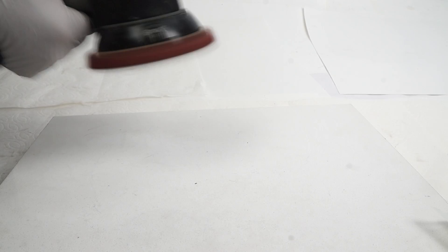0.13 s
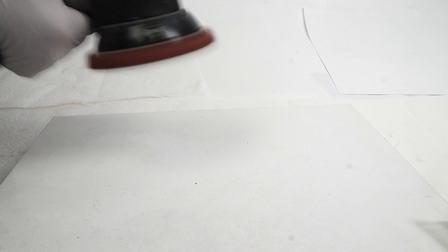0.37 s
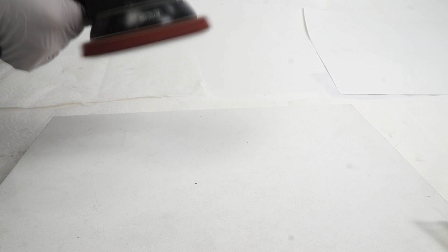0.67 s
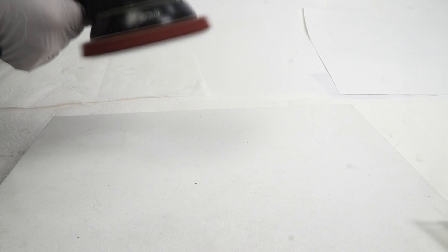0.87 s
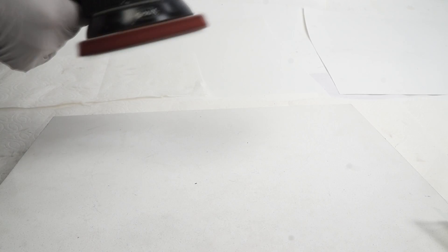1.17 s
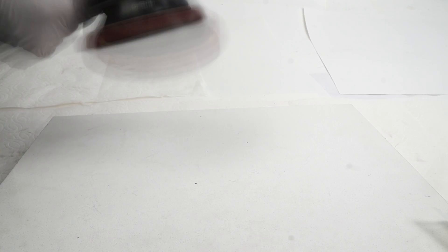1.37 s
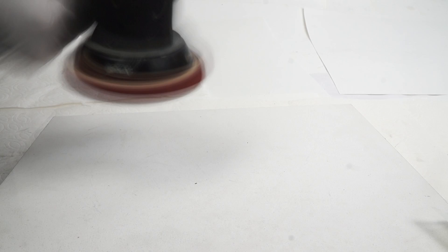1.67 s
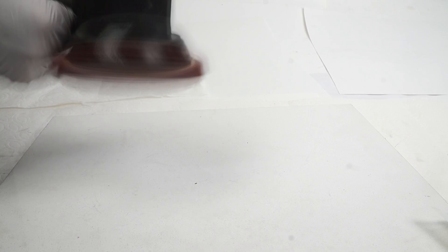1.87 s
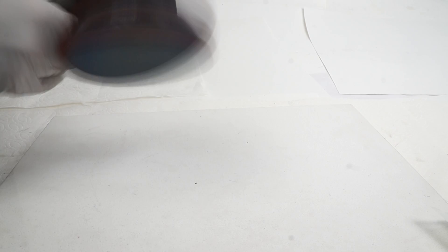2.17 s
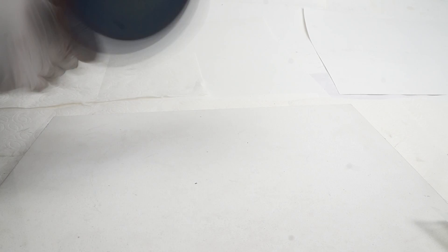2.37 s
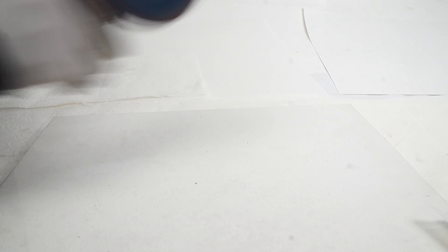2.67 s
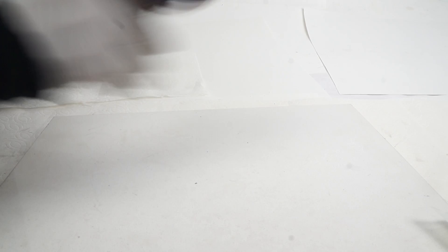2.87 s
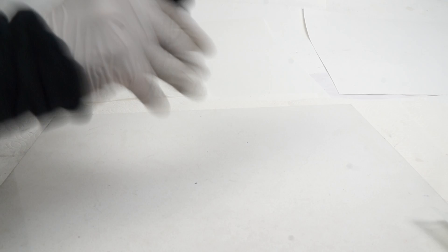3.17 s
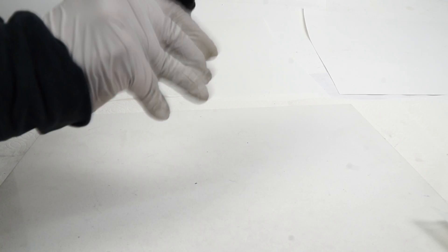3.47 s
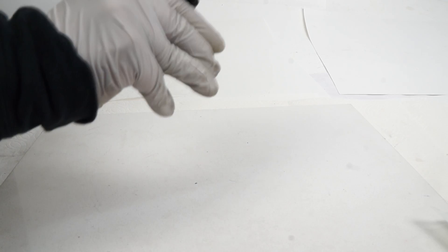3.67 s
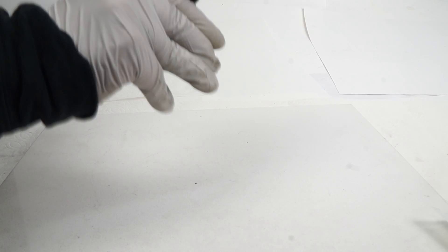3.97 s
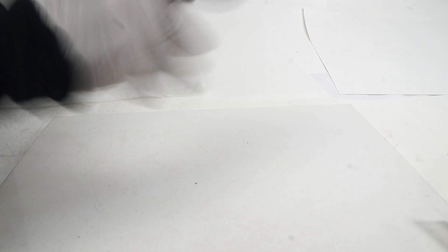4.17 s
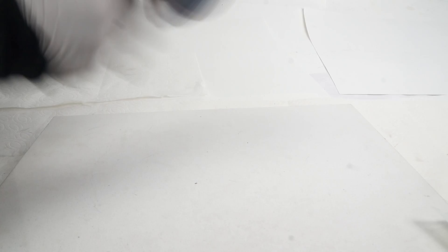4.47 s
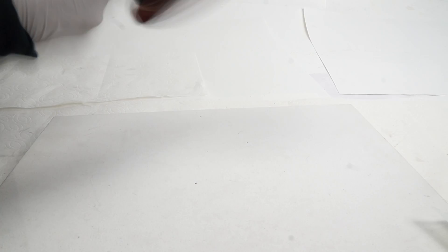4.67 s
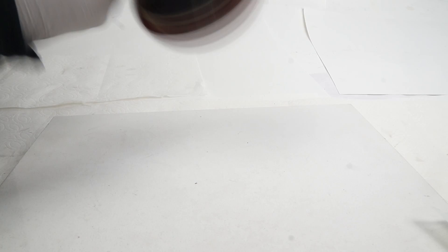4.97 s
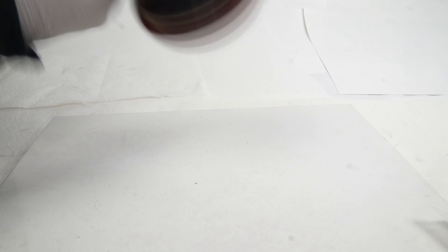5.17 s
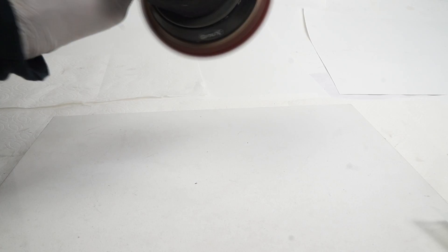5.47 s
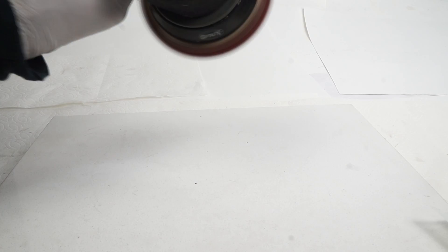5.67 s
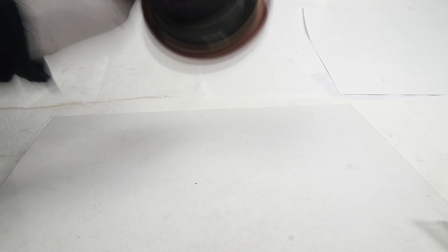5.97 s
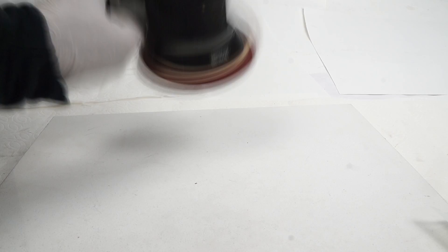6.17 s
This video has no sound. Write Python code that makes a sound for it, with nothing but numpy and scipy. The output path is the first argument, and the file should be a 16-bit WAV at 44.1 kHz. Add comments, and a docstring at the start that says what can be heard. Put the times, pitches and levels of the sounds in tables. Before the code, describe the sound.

Close up in a small workshop with a steady fan drone, an air sander winds down. A low hum, rapid rattle and brief metallic scrapes come first, with a dry hiss. Rapid bearing ticks join in, then a burst of clacks with a thump. The rattle fades into a smooth rolling whirr, until a sharp clack, a faint grumble and more ticks end with a soft bump.

```python
"""A ventilation fan drones in a workshop; close by, an air-powered palm sander coasts down in a gloved hand.
At first its off-centre pad hums (sines) and rattles twice a turn (pulsed noise), with scrapes of metal.
The pad freewheels more slowly than the shaft; its loose bearing soon ticks three times a turn (struck modes).
Clacks and a thump follow as the tool is turned over, then the balls roll on with a smooth whirr.
Late on, the slow pad grumbles in its housing, among more clacks, ticks and a last thump."""
import sys
import numpy as np
from scipy import signal
from scipy.fft import rfft, irfft, next_fast_len
from scipy.io import wavfile
from scipy.ndimage import uniform_filter1d, map_coordinates

SR = 44100
rng = np.random.default_rng(int(sys.argv[2]) if len(sys.argv) > 2 else 0)


def dump(signal):
    """Clip the signal to [-1, 1] and save it as 16-bit WAV at the path in sys.argv[1]."""
    limited = np.clip(np.atleast_2d(signal).T, -1, 1)
    pcm = np.round(limited * 32767).astype(np.int16)
    wavfile.write(sys.argv[1], SR, pcm)


N = 279594

# dry rubbing in the bearing, before each layer's trim: (time [s], level [dB])
DRY_RUB = [(0, -37.5), (.85, -46), (1.3, -47), (2.4, -51), (4, -60), (4.8, -52.5), (5.6, -54), (5.8, -58.5),
           (6.34, -59.5)]
# colour of metal hissing on metal: (frequency [Hz], density [dB per Hz])
HISS_COLOUR = [(2060, -31), (3500, 3), (4290, -1.5), (4750, -2), (6910, 0), (7900, 2), (9810, -11),
               (10800, -9), (11700, -16), (12400, -22), (13600, -12), (16000, -41)]
# resonances of the loose bearing: (frequency [Hz], width [Hz], level [dB])
BEARING_MODES = [(1010, 240, -8), (1630, 136, -3.5), (2210, 77, 1.5), (3210, 340, -4.5), (4660, 190, -1.5),
                 (5350, 480, -6.5), (6990, 420, 3.5), (7580, 245, 6.5), (8320, 780, 4), (9720, 710, -2),
                 (12020, 890, -13), (13500, 130, -8), (14500, 330, -14)]
# dull bumps of the tool's body: (time [s], peak before trim [dB], softness: loss above lowest mode [dB/octave])
BUMPS = [(1.0814, -9, -2.5), (5.3628, -19, 3.5)]


def amp(db):
    """Decibels to gain."""
    return 10 ** (np.asarray(db) / 20)


def unit(x):
    """Scale to rms 1."""
    return x / np.sqrt(np.mean(x ** 2) + 1e-20)


def spread(*shape):
    """Normal chance, clipped to avoid extreme draws."""
    return np.clip(rng.standard_normal(shape or None), -1.5, 1.5)


def along(points, hz):
    """(Hz, value) points read on a log frequency axis."""
    f, v = np.transpose(points)
    return np.interp(np.log(hz + 1), np.log(f + 1), v)


def curve(rows):
    """(s, value) rows as one value per sample."""
    return np.interp(np.arange(N) / SR, *np.transpose(rows))


def level(rows, fade=0.36):
    """Gain of a dB curve that fades away outside its span, with a time constant of fade seconds."""
    t = np.arange(N) / SR
    outside = np.maximum(rows[0][0] - t, 0) + np.maximum(t - rows[-1][0], 0)
    return amp(curve(rows)) * np.exp(-outside / fade)


def wobble(rate):
    """A smooth random curve, rate knots a second."""
    knots = rng.standard_normal(int(N * rate / SR) + 4)
    return map_coordinates(knots, [np.arange(N) * rate / SR])


def wavering(x, depth, rate):
    """x with its pitch straying by the share depth, rate knots a second."""
    position = np.cumsum(1 + depth * wobble(rate))
    return map_coordinates(x, [position], mode="mirror")


def filtered(x, response):
    """x times a response of frequency."""
    size = next_fast_len(N + SR // 2)
    hz = np.fft.rfftfreq(size, 1 / SR)
    return irfft(rfft(x, size) * response(hz), size)[..., :N]


def rush(shape, drive=1):
    """Noise, shaken by drive, through a spectrum; rms 1."""
    noise = drive * rng.standard_normal(N)
    return unit(filtered(noise, lambda hz: amp(along(shape, hz))))


def ringing(modes, f):
    """Response of (Hz, width, dB) resonances, summed with alternating sign."""
    response = 0
    for k, (centre, width, db) in enumerate(modes):
        damping = 1j * f * width
        response = response + (-1) ** k * amp(db) * damping / (centre * centre - f * f + damping)
    return response


def blow(gain, life, size=4096):
    """One short gritty contact through a causal colour, scaled to a peak of about 1."""
    u = np.arange(size) / SR / life
    grit = rng.standard_normal(size) * u * np.exp(-u)
    # folding the cepstrum forward gives the colour minimum phase, so nothing sounds early
    cepstrum = irfft(np.log(np.abs(gain(np.fft.rfftfreq(size, 1 / SR))) + 1e-6))
    colour = np.exp(rfft(2 * cepstrum[:size // 2], size))
    hit = irfft(rfft(grit) * colour)
    return hit / np.linalg.norm(hit) * np.sqrt(life * SR / 2)


def add(track, s, sound):
    """Mix a sound into a track at s seconds."""
    part = track[max(round(s * SR), 0):][:len(sound)]
    part += sound[:len(part)]


def speed():
    """Turns a second of the shaft, coasting down exponentially under drag."""
    start_speed, drag_per_s = 56.4, .164  # turns a second, decay rate
    return start_speed * np.exp(-drag_per_s * np.arange(N) / SR)


def turns():
    """Shaft angle in turns."""
    return np.cumsum(speed()) / SR


def contacts(per_turn, life, scatter_db, jitter):
    """Envelope of contacts tied to the shaft, each with its own strength and slight time shift."""
    at = np.flatnonzero(np.diff(np.floor(per_turn * turns())))
    chance = spread(len(at), 2)
    at = np.clip(at + jitter * SR * chance[:, 0], 0, N - 1).astype(int)
    strikes = np.bincount(at, amp(scatter_db * chance[:, 1]), N)
    u = np.arange(SR // 20) / SR / life
    return unit(signal.fftconvolve(strikes, u * np.exp(-u))[:N])


def fan(fan_db=-49.5, drift=0.58):
    """Ventilation: moving air as a low noise drone, with two tones unsteady in level and phase."""
    # colour of the drone: (frequency [Hz], density [dB per Hz])
    drone_colour = [(20, -11.5), (35, -6.5), (80, -12.5), (140, -7), (195, -11), (232, 4.5), (260, 0),
                    (300, -1), (420, -14.5), (900, -12.5), (1400, -29), (2200, -13.5), (5000, -27.5),
                    (16000, -39)]
    # the tones: (frequency [Hz], mean level [dB])
    fan_tones = [(284, -57.5), (568, -63.5)]
    t = np.arange(N) / SR
    sound = amp(fan_db) * rush(drone_colour)
    for hz, db in fan_tones:
        phase = 2 * np.pi * hz * t + drift * wobble(8.2)
        sound += amp(db + wobble(4.54)) * np.sin(phase)
    return sound


def hum(gain_db=-4, waver_db=1.5):
    """The off-centre pad shakes the tool at the shaft's first orders."""
    # unbalance before trim: (time [s], level [dB])
    unbalance = [(0, -47), (.3, -47.5), (1, -56), (1.9, -54.5), (2.2, -63)]
    # mean strength at 1, 2, 3, .. times the shaft speed: level [dB]
    order_levels = [-1, -5.5, 3, -3.5, -5, -12]
    angle = 2 * np.pi * turns()
    tone = np.zeros(N)
    for order, db in enumerate(order_levels, start=1):
        phase = order * angle + rng.uniform(0, 2 * np.pi)
        tone += amp(db + waver_db * wobble(4.96)) * np.sin(phase)
    return amp(gain_db) * level(unbalance) * tone


def rattle(gain_db=1, even_speed=50, fade_speed=7, far_side=0.93):
    """The pad knocks across its play twice a turn; as it slows, one side knocks harder."""
    # the pad's play before trim: (time [s], level [dB])
    play = [(0, -37), (1.03, -39), (1.15, -47.5), (1.4, -42.5), (1.95, -43.5), (2.1, -50.5), (2.3, -53.5)]
    # colour of the knocking: (frequency [Hz], density [dB per Hz])
    knock_colour = [(88, -32), (150, -9), (189, -6), (289, -11), (350, -4), (386, 0.5), (833, 5),
                    (1090, 2.5), (1200, 3), (1770, 2), (2230, 6), (4120, -12.5), (8410, -10.5),
                    (10600, -22), (15000, -35)]
    rub = .4  # steady rubbing beside the knocks
    lopsided = np.clip((even_speed - speed()) / fade_speed, 0, 1)
    both = contacts(2, life=0.0021, scatter_db=1.5, jitter=0.00046)
    one = contacts(1, life=0.0018, scatter_db=3.5, jitter=0.0011)
    knocks = (1 - lopsided * (1 - far_side)) * both + lopsided * one
    drive = np.hypot(knocks / (1 + far_side * lopsided), rub)
    return amp(gain_db) * level(play) * rush(knock_colour, drive)


def scrape(gain_db=0, rub=1.0, hiss_db=-8, attack=.012, release=0.029):
    """Metal brushes metal, pulsing once a turn; it hisses and rings the steel parts."""
    # spells of scraping, before each trim: (start [s], length [s], level [dB])
    scrape_spells = [(0, .105, -25.5), (.385, .06, -38.5), (0.538, 0.12, -36), (1.456, 0.012, -42.5)]
    # resonances of the steel: (frequency [Hz], width [Hz], level [dB])
    steel_modes = [(4560, 270, -11.5), (5990, 250, 2), (7420, 155, 2.5), (8970, 200, -3),
                   (9620, 300, -11.5), (11800, 890, -14.5), (14500, 250, -14)]
    t = np.arange(N) / SR
    touch = np.zeros(N)
    for start, length, db in scrape_spells:
        rise = np.minimum(t - start, 0) / attack
        fall = np.maximum(t - start - length, 0) / release
        touch += amp(db) * np.exp(rise - fall)
    strokes = np.hypot(contacts(1, life=.002, scatter_db=1.5, jitter=.001), rub)
    ring = unit(filtered(strokes * rng.standard_normal(N), lambda hz: ringing(steel_modes, hz)))
    hiss = rush(HISS_COLOUR, strokes)
    return touch * (amp(gain_db) * ring + amp(hiss_db) * hiss)


def bearing(whirr_db=1, hiss_db=-1, grumble_db=1, grain_db=1.5):
    """A grainy dry hiss, the whirr of freely rolling balls, then the slow pad grumbling in its housing."""
    # free rolling, before trim: (time [s], level [dB])
    whirr_level = [(1.95, -46.5), (2.25, -42.5), (4.15, -44.5), (4.45, -49), (4.65, -56), (6.34, -69)]
    # colour of the whirr: (frequency [Hz], density [dB per Hz])
    whirr_colour = [(400, -16.5), (820, -21), (960, -3.5), (1070, -5), (1190, 2.5), (1320, -3.5),
                    (1500, -7.5), (2300, -12.5), (3200, -17), (4500, -31), (9000, -55)]
    # the grumbling pad, before trim: (time [s], level [dB])
    grumble_level = [(4.7, -78), (4.9, -51), (5.5, -53), (5.8, -57.5), (6.34, -56.5)]
    # colour of the grumble: (frequency [Hz], density [dB per Hz])
    grumble_colour = [(250, 0), (380, 6), (600, 4.5), (780, -4), (950, 8), (1250, -10), (1600, 5.5),
                      (2200, -4.5), (3000, -2), (4000, -24), (4600, -9), (5500, -26), (8000, -35)]
    hiss = rush(HISS_COLOUR, amp(grain_db * wobble(400)))
    rolling = rush(whirr_colour, amp(2.1 * wobble(130)))
    whirr = wavering(rolling, depth=.025, rate=12)
    grumble = rush(grumble_colour, amp(2 * wobble(200)))
    sound = amp(hiss_db) * level(DRY_RUB) * hiss
    sound += amp(whirr_db) * level(whirr_level) * whirr
    return sound + amp(grumble_db) * level(grumble_level) * grumble


def chatter(gain_db=-6):
    """Fainter ticks once a shaft turn ring the bearing, as strong as it is dry."""
    drive = contacts(1, life=.0005, scatter_db=4, jitter=.002) * rng.standard_normal(N)
    ring = unit(filtered(drive, lambda hz: ringing(BEARING_MODES, hz)))
    return amp(gain_db) * level(DRY_RUB) * ring


def catches(scatter_db=1.05):
    """(s, dB) of each catch of the bearing as the freewheeling pad turns."""
    # spells of ticking: (start [s], end [s], first turn [s], each turn longer by [s],
    # stretch of the catches' spacing [ratio], second catch [dB], third catch [dB])
    tick_spells = [ (.164, .66, .0682, .00072, 1.26, 1, -2), (.7295, 1.04, .0741, .00066, 1.2, -14, -4),
                   (1.2413, 2.12, .0743, .0003, .88, -9, -10), (2.1585, 3.05, .0842, .00048, .88, -6, -6),
                   (4.4965, 5.01, .0683, -.0008, 1.05, -8, -7), (5.0185, 5.64, .0695, .00072, 1, -8, -2),
                   (5.675, 5.8, .0825, 0, .95, -5, -14), (5.848, 6.3, .081, 0, .8, -1, -9)]
    # how hard the bearing catches as the tool is tilted, before trim: (time [s], peak [dB])
    catch_force = [(.16, -29), (.58, -13.5), (.75, -21), (1.3, -22), (1.54, -19.5), (2, -22.5), (2.5, -43),
                   (3, -42), (4.5, -30.5), (4.8, -18.5), (5.25, -17.5), (5.65, -19), (5.9, -33.5)]
    # where the bearing catches in each turn, before the stretch: place [share of the turn]
    catch_places = [0, .36, .64]
    for start, end, turn_s, longer_s, stretch, second_db, third_db in tick_spells:
        turn_start = start
        while turn_start < end:
            for share, db in zip(catch_places, [0, second_db, third_db]):
                s = turn_start + stretch * share * turn_s
                if s < end:
                    force_db = np.interp(s, *np.transpose(catch_force))
                    yield s, force_db + db + scatter_db * spread()
            turn_start += turn_s
            turn_s += longer_s


def tick(life, vary_db):
    """One contact rings the bearing's modes at new strengths."""
    modes = [(hz, width, db + vary_db * spread()) for hz, width, db in BEARING_MODES]
    return blow(lambda hz: ringing(modes, hz), life)


def ticks(gain_db=-2, life=0.00074, vary_db=3, bounce_db=-11, bounce_time=.011):
    """At each catch, loose bearing parts drop against each other and bounce once."""
    jolt_s, jolt_db = .015, 2  # a bump sets off at once a catch due this soon, and harder
    track = np.zeros(N)
    for s, db in catches():
        for bump_s, _, _ in BUMPS:
            if 0 < s - bump_s < jolt_s:
                s, db = bump_s, db + jolt_db
        add(track, s, amp(db + gain_db) * tick(life, vary_db))
        bounce_s = s + bounce_time * rng.uniform(0.1, 1)
        add(track, bounce_s, amp(db + gain_db + bounce_db) * tick(life, vary_db))
    return track


def clack(body_db, edge_db, life):
    """One hard contact, with its share of body and of bright edge."""
    # colour of the contact: (frequency [Hz], density [dB per Hz])
    clack_colour = [(300, -10), (1500, -3), (2300, 4), (3000, 6), (4000, 6.5), (4900, -2), (6300, 0.5),
                    (7500, 4), (9500, -1.5), (10600, -3), (12500, -0.5), (14200, -1), (15500, 3)]
    tilt = [(1000, body_db / 2), (3500, body_db), (5800, 0), (9500, 0), (11000, edge_db)]  # (Hz, dB)
    strength = np.sqrt(1 + amp(body_db) ** 2 + amp(edge_db) ** 2)
    return strength * blow(lambda hz: amp(along(clack_colour, hz) + along(tilt, hz)), life)


def steel_ring(t60=0.64, size=SR // 2):
    """Many close steel modes sing on after a blow and blur into a bright hiss."""
    # colour of the afterglow: (frequency [Hz], density [dB per Hz])
    glow_colour = [(2500, -33), (4000, -6), (4700, -13), (5500, -6), (6400, -4), (7500, -4), (8200, -9),
                   (9300, -7), (10500, -22), (13800, -25), (16000, -35)]
    colour = amp(along(glow_colour, np.fft.rfftfreq(size, 1 / SR)))
    glow = unit(irfft(rfft(rng.standard_normal(size)) * colour, size))
    return glow * amp(-60 * np.arange(size) / SR / t60)


def clacks(gain_db=0, life=0.0011):
    """Lever and hose coupling chatter at widening gaps; each contact leaves the steel ringing."""
    # quick runs of contacts: (time [s], contacts [count], first gap [s], first level [dB],
    # change per contact [dB], first body [dB], edge [dB], afterglow against the contact [dB])
    clack_runs = [ (1.0632, 3, .0058, -10, 1, 1.5, -16, -31), (1.0809, 4, .005, -6.5, -1.5, -16, -9.5, -30),
                  (1.592, 2, .004, -16.5, 6, -6, -13, -38), (1.6628, 2, .0056, -21.5, 9, -3.5, -13, -38),
                  (4.6444, 1, 0, -9, 0, -16, 1, -30), (4.654, 4, .0115, -17.5, -1.5, -12.5, -10, -28)]
    gap_growth, body_step_db = 1.1, -5  # each gap over the one before; body change per contact
    track = np.zeros(N)
    for s, count, gap, first_db, step_db, body_db, edge_db, ring_db in clack_runs:
        for k in range(round(count)):
            db = first_db + k * step_db
            contact = clack(body_db + k * body_step_db, edge_db, life)
            add(track, s, amp(db + gain_db) * contact)
            add(track, s, amp(db + ring_db) * steel_ring())
            s += gap * gap_growth ** k
    return track


def thumps(gain_db=-3, attack=0.0014, cut_hz=100):
    """A bump rings the body's damped modes: a quick low push, more hollow when the contact is firm."""
    # modes of the body: (frequency [Hz], level [dB], t60 [s])
    body_modes = [(187, -18, 0.29), (231, -1.5, 0.051), (293, 8, 0.022), (364, -4.5, 0.048),
                  (428, -9.5, 0.073), (651, -13.5, 0.16), (1750, -26, 0.12), (1980, -24, 0.091)]
    track, t = np.zeros(N), np.arange(SR // 3) / SR
    for s, db, softness in BUMPS:
        for hz, mode_db, t60 in body_modes:
            soft_db = softness * np.log2(hz / body_modes[0][0])
            start_db = db + gain_db + mode_db + rng.normal(0, 1) - soft_db
            ring = amp(start_db - 60 * t / t60) * np.sin(2 * np.pi * hz * t)
            add(track, s, ring * (1 - np.exp(-t / attack)))
    # a body this small radiates no deep bass
    return signal.sosfilt(signal.butter(2, cut_hz, "high", fs=SR, output="sos"), track)


def room(x, wet_db):
    """Direct sound in the middle, plus the workshop's decaying noise tail, a little wide."""
    # decay of the workshop: (frequency [Hz], t60 [s])
    room_decay = [(100, 0.21), (500, 0.62), (2000, 0.27), (6500, 0.27), (15000, 0.26)]
    # width of the room's answer: (frequency [Hz], side level [dB])
    room_width = [(30, -5), (125, -17), (500, -5.5), (4000, -9.5), (8000, -16), (13000, -19.5)]
    hz, t, z = signal.stft(rng.standard_normal((2, SR // 2)), SR, nperseg=256)
    decay = amp(-60 * t / along(room_decay, hz)[:, None])
    tail = signal.istft(z * decay, SR, nperseg=256)[1]
    # the tail starts 1/300 s after the direct sound
    tail = np.pad(tail / np.linalg.norm(tail[0]), ((0, 0), (SR // 300, 0)))
    mid, side = amp(wet_db) * signal.fftconvolve(x[None], tail, axes=1)[:, :N]
    side = filtered(side, lambda hz: amp(along(room_width, hz)))
    return x + np.array([mid + side, mid - side])


def gain_control(x, threshold_db=-21, slope=0.5, recovery_db=11, attack=0.017):
    """Loud hits push the gain down; it creeps back by recovery_db a second."""
    t = np.arange(N) / SR
    power = np.abs(uniform_filter1d(x.mean(0) ** 2, size=64))
    loud_db = 10 * np.log10(power + 1e-12)
    cut = slope * np.maximum(loud_db - threshold_db, 0)
    held = np.maximum.accumulate(cut + recovery_db * t) - recovery_db * t
    keep = np.exp(-1 / (attack * SR))
    return x * amp(-signal.lfilter([1 - keep], [1, -keep], held))


def scene():
    """The sander close by and the fan behind it, each layer with its own share of room."""
    mix = room(fan(), wet_db=-6)
    running = hum() + rattle() + scrape() + bearing() + chatter()
    mix += room(running, wet_db=-10.5)
    mix += room(ticks(), wet_db=-14.0)
    mix += room(clacks(), wet_db=-7.0)
    return mix + room(thumps(), wet_db=-16.5)


def record(dry):
    """Two slightly unlike microphone ports, automatic gain and the band limit."""
    # balance of the ports: (frequency [Hz], left over right [dB])
    port_balance = [(100, .1), (500, 0.48), (2500, 0.37), (3400, 0.73), (4200, 1.1), (4800, .1), (8200, .1),
                    (8800, 1.2), (12500, .1)]
    # phase between the ports: (frequency [Hz], left lags by [radians])
    port_lag = [(100, 0), (700, 0), (3200, 0.18), (4400, 0), (7500, 0), (8500, 0.38), (10500, 0.096)]
    top_hz = 15800
    sides = np.array([[.5], [-.5]])  # each port takes half the difference

    def ports(hz):
        """Gain and phase of the left and right port."""
        return amp(sides * along(port_balance, hz)) * np.exp(-1j * sides * along(port_lag, hz))

    pair = gain_control(filtered(dry, ports))
    return filtered(pair, lambda hz: np.clip((top_hz - hz) / 400 + .5, 0, 1))


dry = scene()
out = record(dry)
dump(out)
```